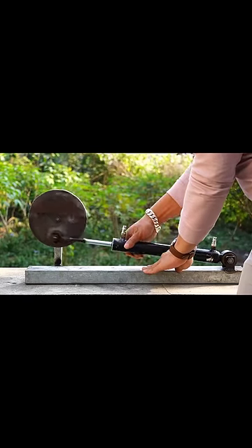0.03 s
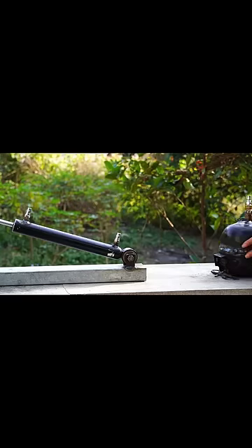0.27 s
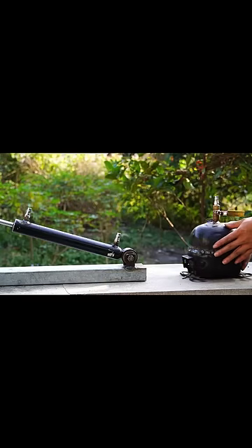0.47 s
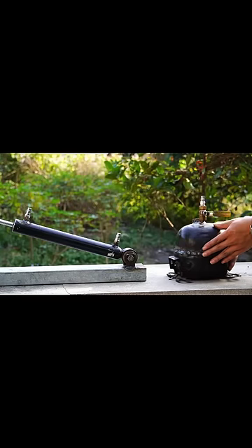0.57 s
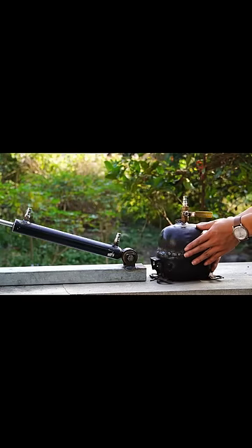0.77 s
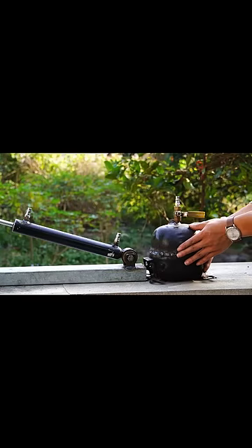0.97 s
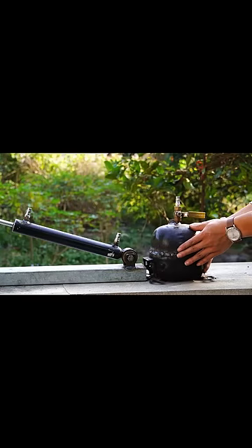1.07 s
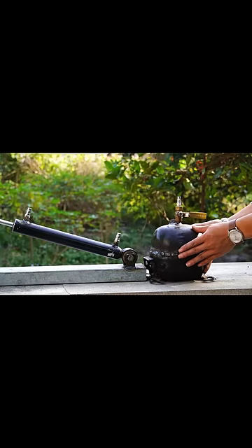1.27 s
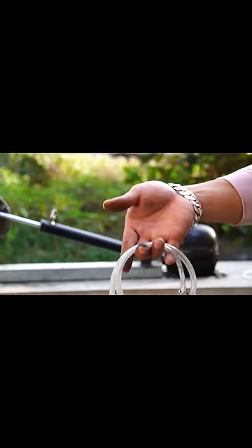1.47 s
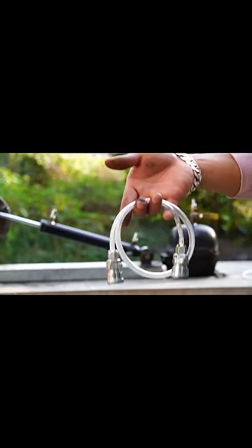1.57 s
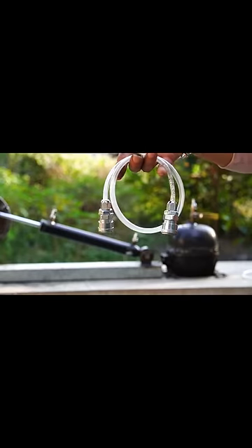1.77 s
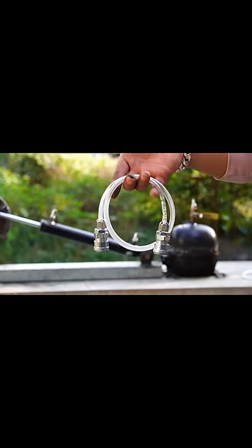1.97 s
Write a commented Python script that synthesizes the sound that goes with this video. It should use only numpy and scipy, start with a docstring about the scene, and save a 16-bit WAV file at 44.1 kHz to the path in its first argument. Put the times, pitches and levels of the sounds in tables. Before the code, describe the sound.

Heavy metal tank grinding over a stone slab, ending in a clink and quiet garden air.

```python
"""Light metal knocks as a rig is set down outdoors, then a heavy steel tank grinds over a stone slab.
Grit under its feet makes the shell ring, and their stick-slip judder makes the slab rumble.
The tank catches, squeaks and stops with a clink. Behind it, garden air switches colour and level
abruptly twice, with a low drone, soft thuds and, near the end, a far hoot and an insect-like whine."""
import sys
import numpy as np
from scipy import signal
from scipy.fft import rfft, irfft
from scipy.io import wavfile
from scipy.ndimage import uniform_filter1d

SR = 44100
rng = np.random.default_rng(int(sys.argv[2]) if len(sys.argv) > 2 else 0)


def generate_wav(sig):
    """Save sig (samples, or channels by samples) to the path in sys.argv[1] as 16-bit PCM at SR."""
    pcm = np.round(np.clip(np.atleast_2d(sig).T, -1, 1) * 32767).astype(np.int16)
    wavfile.write(sys.argv[1], SR, pcm)


N = 88200
T = np.arange(N) / SR
FIRST_END_S, SECOND_END_S = .197, 1.357  # the garden air switches here
SHELL_LIKENESS = 0.72  # left-right correlation


def tank_scrape():
    """Grit drives the steel shell, harder at each catch; it radiates little below its first mode."""
    push = [(.192,-33.5),(.29,-28.5),(.38,-24),(.49,-26),(.58,-28.5),(.62,-33),(.66,-26),(.75,-30.5),(.81,-29.5),(.87,-35.5),(1.06,-47),(1.12,-61)]  # force of the shove: time_s, level_db
    catches = [(.22,-29.5),(.296,-22.5),(.473,-31.5),(.569,-19),(.726,-26),(.775,-18.5),(1.071,-53.5)]  # feet snagging on stone: start_s, level_db
    shell_modes = [(2410,8,0),(2872,10,3),(3322,14,-1),(3658,12,-3),(3875,9,0),(4295,14,-1),(4630,40,-2),(5479,22,-4),(5824,26,-6),(7320,70,-6),(9165,45,-4)]  # shell resonances: pitch_hz, width_hz, level_db
    low_modes = [(2150,25,0),(2200,45,-4)]  # strong low ring: pitch_hz, width_hz, level_db
    high_modes = [(2615,10,0)]  # strong high ring: pitch_hz, width_hz, level_db
    low_surges = [(.33,0.084,-31.5),(.47,0.058,-25),(.65,0.053,-34),(.86,0.029,-36.5)]  # chatter swells the low ring: peak_s, half_width_s, level_db
    high_surges = [(.308,0.0091,-25),(.375,0.031,-25),(.574,.008,-25.5),(.735,.025,-31.5),(.98,0.093,-45)]  # and the high ring: peak_s, half_width_s, level_db
    grind_eq = [(500,-26.5),(1400,-26),(1720,-51),(2050,-7.5),(2550,9),(3250,-2.5),(4620,-0.5),(4800,-13),(5800,-6.5),(6800,-11),(7350,-4),(8000,-15.5),(9250,-10.5),(9850,-42),(10400,-17.5),(12000,-16.5),(12800,-21),(14500,-19.5)]  # colour of the grinding: freq_hz, level_db
    pan = [(.2,-4),(.4,-2.5),(1.1,0)]  # stereo position: time_s, left_minus_right_db
    force = level(push) + bursts(catches, decay_s=0.014)
    rings = from_db(-7) * force * singing(shell_modes)
    rings += from_db(0.5) * swells(low_surges) * steady(singing(low_modes), 0.045)
    rings += from_db(3) * swells(high_surges) * steady(singing(high_modes), .02)
    rings = cut(rings * (T > FIRST_END_S), 1850, "high", order=12)
    grind = from_db(-2) * dense_ring(force * colour(grit(), grind_eq))
    return (rings + grind) * from_db(np.interp(T, *np.transpose(pan)) * np.array([[.5], [-.5]]))


def grit(grains_per_s=5500, spread_db=2.5):
    """Dense tiny fractures of uneven size under the feet."""
    sizes = from_db(spread_db * np.minimum(rng.exponential(1, (2, N)), 5))
    signs = rng.choice([-1, 1], (2, N))
    cracks = rng.random((2, N)) < grains_per_s / SR
    return stereo(sizes * signs * cracks, SHELL_LIKENESS) * from_db(4.9 * drift(170))


def singing(modes, wander_db=4):
    """Narrow resonances kept ringing by grit, their shares wandering as the contact moves; rms 1."""
    drive = grit()
    out = 0
    for hz, width, db in modes:
        ring = resonate(resonate(drive, hz, width), hz, 10 * width)
        out += steady(ring, .025) * from_db(db + wander_db * drift(12))
    return rms_one(out)


def dense_ring(x, t60_s=0.099, ring_db=7.5):
    """The shell's countless weaker modes ring on briefly after the direct sound."""
    tail = (noise(SHELL_LIKENESS) * from_db(-60 * T / t60_s))[:, :N // 8]
    tail = from_db(ring_db) * tail / np.linalg.norm(tail[0])
    return (x + signal.fftconvolve(x, tail, axes=1)[:, :N]) / np.hypot(1, from_db(ring_db))


def tank_halt():
    """The slowing feet squeak, then the tank bumps to rest with a bright crunch and a rattling clink."""
    squeaks = [(.934,-26),(.9425,-34),(.974,-42.5)]  # stick-slip squeaks: start_s, level_db
    squeak_modes = [(4635,29,3),(7160,54,-10.5),(9194,75,-7.5),(11300,330,-15),(14940,170,-15.5)]  # their resonances: pitch_hz, width_hz, level_db
    hits = [(1.073,-29.5),(1.094,-38.5)]  # the final bump: start_s, level_db
    clink_modes = [(2600,-3,0.043),(3240,-35.5,0.71),(3310,-7,0.21),(3478,-12,0.18),(4640,-6,0.18)]  # the steel it rings: pitch_hz, level_db, t60_s
    squeak = steady(singing(squeak_modes), 0.0062) * bursts(squeaks, decay_s=0.02)
    crunch = from_db(3) * rms_one(cut(body(grit(), squeak_modes), 8800, "high"))
    rattle = from_db(6.5) * body(grit(), [(3216, 150, 0)])
    bump = dense_ring((crunch + rattle) * bursts(hits, decay_s=0.0039)) + strike(hits, clink_modes)
    return cut(squeak + bump, 2230, "high", order=8)


def slab_rumble(judder_hz=92.05, jitter=0.25):
    """The feet stick and slip at an uneven rate; each slip shakes the slab."""
    slab_modes = [(93.5,32,4.5),(190.3,11,4),(231.9,3.9,0)]  # stone resonances: pitch_hz, width_hz, level_db
    judders = [(.252,0.026,-25),(.365,0.047,-31.5),(.503,0.03,-30.5),(.606,0.031,-31),(.785,0.071,-33),(.865,0.04,-26.5),(1.095,0.036,-37.5)]  # surges of judder: peak_s, half_width_s, level_db
    cycles = np.floor(np.cumsum(judder_hz * (1 + jitter * drift(60))) / SR)
    slips = np.diff(cycles, prepend=0) * from_db(5.6 * drift(120))
    shake = cut(body(slips, slab_modes), 270, "low", order=6)
    shake = steady(cut(shake, 65, "high"), .04)
    return from_db(-0.5) * shake * swells(judders)


def rig_knocks():
    """The metal rig touches down in short ringing knocks, each with a puff of scuffing."""
    knocks = [(.037,-34),(.137,-37.5),(.179,-36)]  # contacts: start_s, level_db
    rig_modes = [(759,2,0.11),(1371,-3.5,0.085),(3990,-7.5,0.044)]  # rig resonances: pitch_hz, level_db, t60_s
    scuff_eq = [(600, 18.5), (1400, 7), (1800, 2.5), (4000, 6), (5000, -9.5), (14000, -12)]
    scuff = from_db(-5) * colour(noise(0.63), scuff_eq) * bursts(knocks, decay_s=0.028)
    return strike(knocks, rig_modes) + scuff


def drone():
    """A deep wavering hum."""
    path = [(0,37.7,-41),(1.351,38.2,-46.5),(1.551,44.1,-55.5),(1.65,45,-46),(1.79,41.96,-39),(2,47,-46.5)]  # glide of the hum: time_s, pitch_hz, level_db
    s, hz, db = np.transpose(path)
    phase = 2 * np.pi * np.cumsum(np.interp(T, s, hz) + 1.5 * drift(4.6)) / SR
    return np.sqrt(2) * from_db(np.interp(T, s, db) + drift(24)) * np.sin(phase)


def soft_thuds():
    """Dull, soft thuds in the background."""
    thuds = [(1.225,-49.5),(1.355,-54),(1.885,-43)]  # low bumps: start_s, level_db
    thud_eq = [(65, 12.5), (130, -4), (300, -34), (1000, -58), (4000, -82)]
    rumble = steady(colour(rng.standard_normal(N), thud_eq), 0.031)
    return rumble * bursts(thuds, decay_s=0.044, attack_s=0.0014)


def far_tones():
    """A distant hoot and a thin insect-like whine swell and fade."""
    calls = [(1.497,0.063,0.074,780,24,-52),(1.435,0.03,0.11,824,160,-58.5),(1.63,0.15,0.12,1490,180,-65),(2.03,0.22,.2,7730,450,-73.5)]  # narrow noise bands: peak_s, rise_s, fall_s, pitch_hz, width_hz, level_db
    out = 0
    for s, rise, fall, hz, width, db in calls:
        swell = np.exp(-((T - s) / np.where(T < s, rise, fall)) ** 2 / 2)
        band = resonate(resonate(noise(0.49), hz, width), hz, 2 * width)
        out += from_db(db) * swell * steady(band, 0.04)
    return out


def air(eq, db):
    """Outdoor noise bed, centred in the bass and wider above."""
    mid, side = colour(rng.standard_normal((2, N)), eq)
    return from_db(db) * (mid + from_db(-5.5) * cut(side, 660, "high", order=1) * np.array([[1], [-1]]))


def from_db(db):
    """Decibels to gain."""
    return 10 ** (np.asarray(db) / 20)


def rms_one(x):
    """Scale to rms 1."""
    return x / np.sqrt(np.mean(x ** 2) + 1e-20)


def level(rows):
    """Gain from a (time_s, level_db) curve, silent outside it."""
    return from_db(np.interp(T, *np.transpose(rows), left=-140, right=-140))


def swells(rows):
    """Envelope of bell-shaped surges."""
    return np.sqrt(sum((from_db(db) * np.exp(-((T - s) / half) ** 2 / 2)) ** 2 for s, half, db in rows))


def bursts(rows, decay_s, attack_s=0.00097):
    """Envelope of sudden, dying bursts."""
    out = 0
    for s, db in rows:
        age = np.maximum(T - s, 0)
        out += from_db(db) * (1 - np.exp(-age / attack_s)) * np.exp(-age / decay_s)
    return out


def strike(rows, modes):
    """Each blow rings every mode with a strength of its own."""
    out = np.zeros(N)
    for s, db in rows:
        age = np.maximum(T - s, 0)
        for hz, mode_db, t60 in modes:
            envelope = from_db(db + mode_db + rng.normal(0, 1) - 60 * age / t60)
            out += envelope * np.sin(2 * np.pi * hz * age)
    return out


def resonate(x, hz, width):
    """One resonance with gain 1 at its peak."""
    r = np.exp(-np.pi * width / SR)
    poles = [1, -2 * r * np.cos(2 * np.pi * hz / SR), r * r]
    return signal.lfilter(np.array([1, 0, -1]) * (1 - r * r) / 2, poles, x)


def body(x, modes):
    """Parallel resonances (pitch_hz, width_hz, level_db); rms 1."""
    return rms_one(sum(resonate(x, hz, width) * from_db(db) for hz, width, db in modes))


def colour(x, eq):
    """Filter by a (freq_hz, level_db) curve that falls away below its first point; rms 1."""
    hz, db = np.transpose(eq)
    f = np.maximum(np.arange(N // 2 + 1) * SR / N, 1)
    gain = from_db(np.interp(np.log(f), np.log(hz), db)) / np.sqrt(1 + (hz[0] / f) ** 8)
    return rms_one(irfft(rfft(x) * gain, N))


def cut(x, hz, kind, order=4):
    """High- or low-pass."""
    return signal.sosfilt(signal.butter(order, hz, kind, fs=SR, output="sos"), x)


def steady(x, window_s):
    """Even out slow swings of level."""
    power = np.mean(np.atleast_2d(x) ** 2, axis=0)
    return x / np.sqrt(uniform_filter1d(power, max(int(window_s * SR), 2)) + 1e-9)


def drift(rate_hz):
    """Smooth random wander; rms 1."""
    return rms_one(cut(rng.standard_normal(2 * N), rate_hz, "low", order=2)[N:])


def stereo(pair, likeness):
    """Two unrelated signals become partly alike left and right channels."""
    side = np.sqrt(1 - likeness) * pair[1] * np.array([[1], [-1]])
    return rms_one(np.sqrt(1 + likeness) * pair[0] + side)


def noise(likeness):
    """White stereo noise."""
    return stereo(rng.standard_normal((2, N)), likeness)


def scene():
    """The tank over three stretches of garden air, with the rig in the first and far tones in the last."""
    # colour of the air in each stretch: freq_hz, level_db
    first_eq = [(90,11.5),(364,-2.5),(772,0),(1720,-16.5),(5000,-28),(14000,-26)]
    second_eq = [(60,-1.5),(247,-15.5),(320,-22.5),(3250,-49.5),(14000,-72)]
    third_eq = [(70,-0.5),(400,-9),(1600,-22.5),(2600,-29.5),(14000,-44)]
    first = uniform_filter1d(1. * (T < FIRST_END_S), size=128)
    third = uniform_filter1d(1. * (T > SECOND_END_S), size=128)
    garden = first * (air(first_eq, db=-43) + rig_knocks())
    garden += (1 - first - third) * air(second_eq, db=-53.5)
    garden += third * (air(third_eq, db=-60) + far_tones())
    return tank_scrape() + tank_halt() + slab_rumble() + garden + drone() + soft_thuds()


def record(dry):
    """A steep low-pass trims the top above 15.7 kHz."""
    return signal.sosfilt(signal.ellip(10, .2, 80, 15700, fs=SR, output="sos"), dry)


dry = scene()
out = record(dry)
generate_wav(out)
```